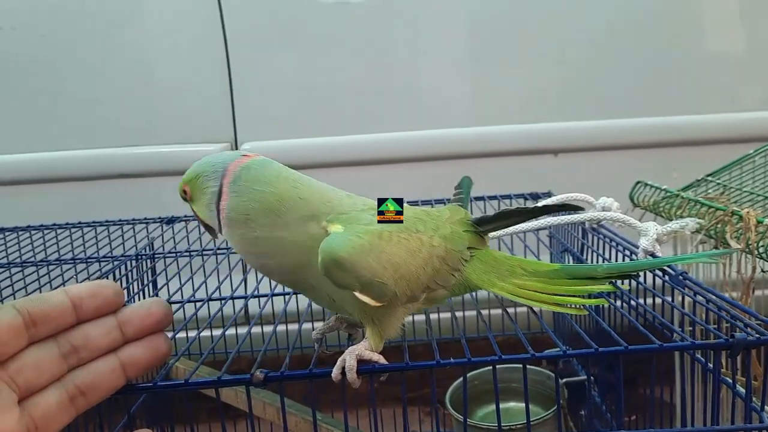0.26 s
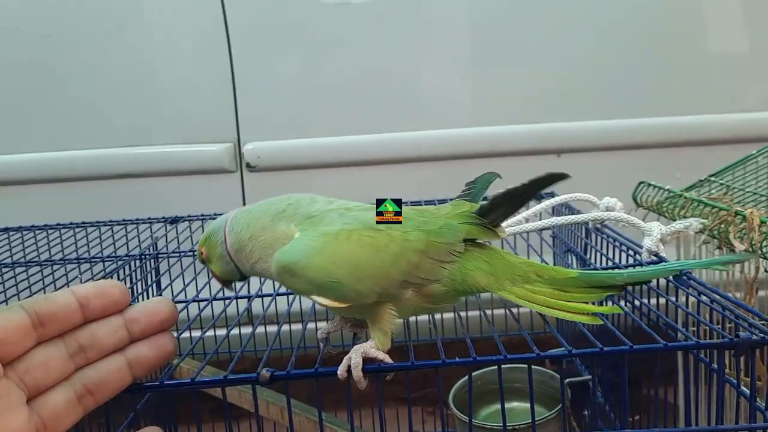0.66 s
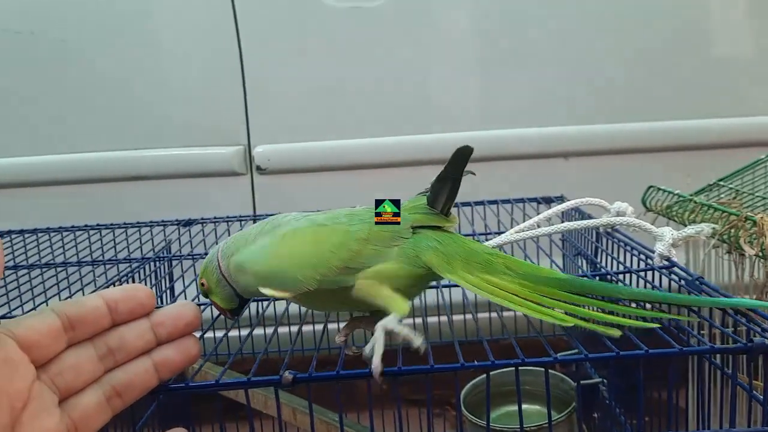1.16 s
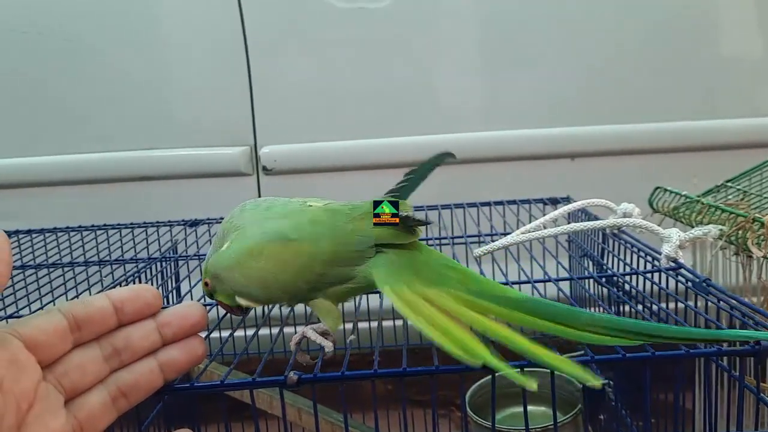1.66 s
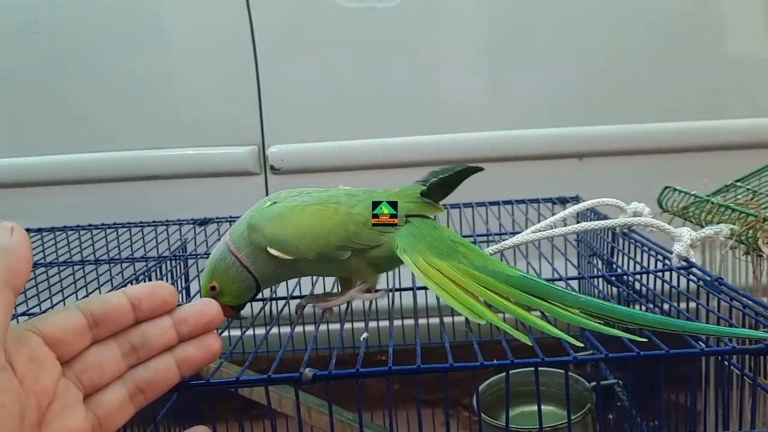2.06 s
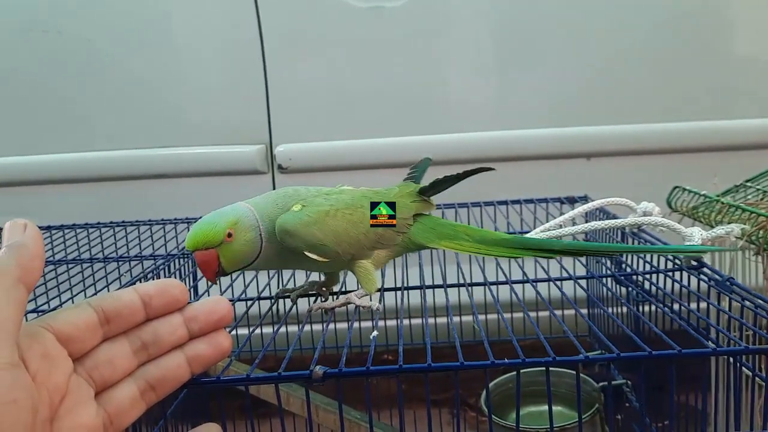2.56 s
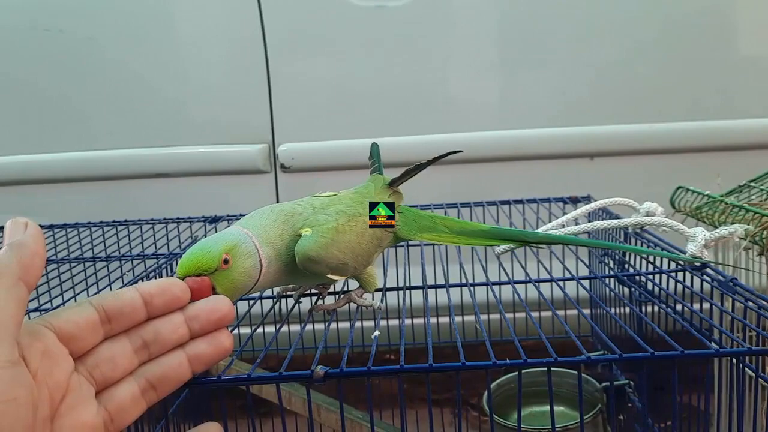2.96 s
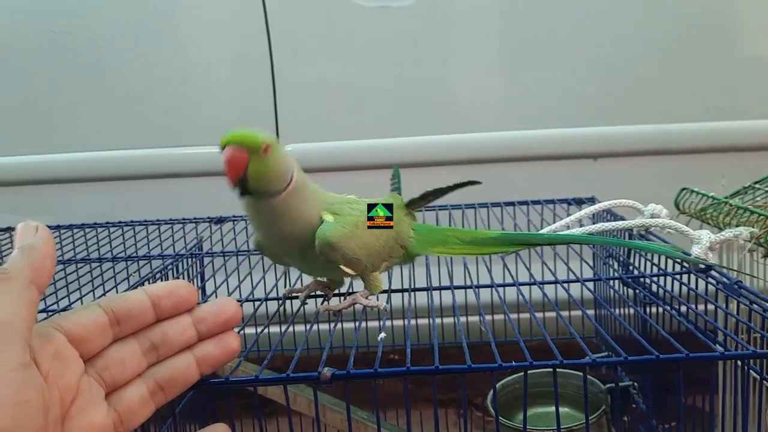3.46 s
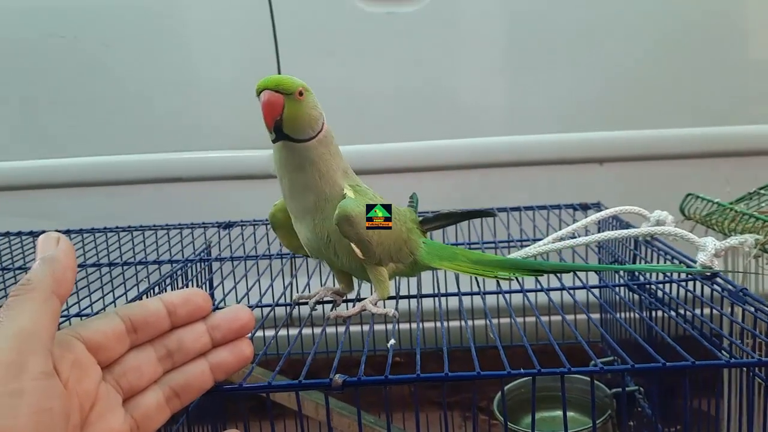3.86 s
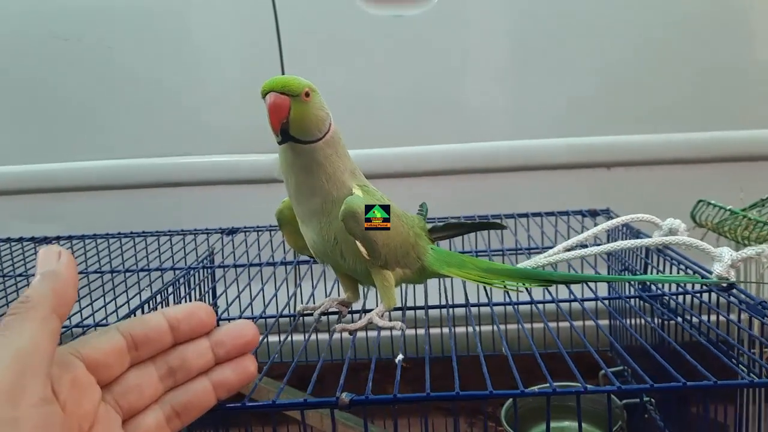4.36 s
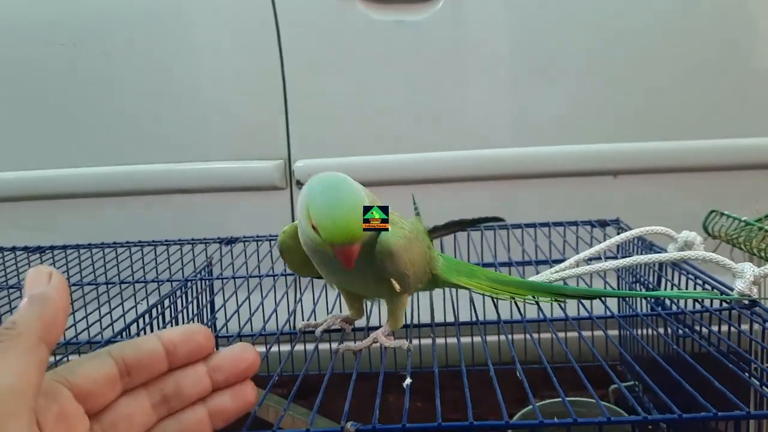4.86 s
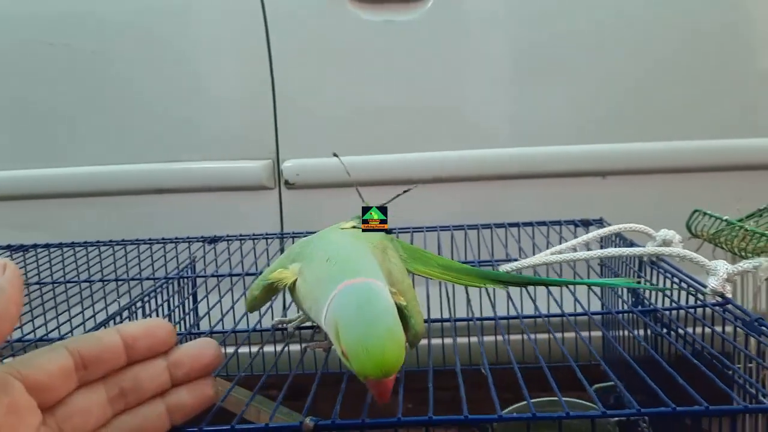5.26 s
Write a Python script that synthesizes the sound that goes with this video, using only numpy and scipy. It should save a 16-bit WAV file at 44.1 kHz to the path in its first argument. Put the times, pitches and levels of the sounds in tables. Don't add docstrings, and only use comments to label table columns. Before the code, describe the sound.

A parakeet heard close in a small hard-walled room. A nasal whine already under way slides down and dies, then claws tick on cage wire with faint feather rustles. One short clear screech drops in pitch; after a pause of light ticks, six loud rasping squawks come in a steady row. A low distant motor hum lies beneath, dipping after the loud calls. Close stereo microphone, bird mostly to the left.

```python
import sys
import numpy as np
from scipy import signal
from scipy.fft import rfft, irfft, next_fast_len
from scipy.io import wavfile
from scipy.ndimage import uniform_filter1d

SR = 44100
rng = np.random.default_rng(int(sys.argv[2]) if len(sys.argv) > 2 else 0)


def bounce(signal):
    frames = np.transpose(np.atleast_2d(signal))
    limited = np.clip(frames, -1, 1)
    pcm = np.round(limited * 32767).astype(np.int16)
    wavfile.write(sys.argv[1], SR, pcm)


def natural_amplitude(level_db):
    exponent = np.asarray(level_db, float) / 20
    return 10 ** exponent


N = 242550

# time_s [s], pitch_hz [Hz], level_db [dB]
WHINE = [
    (0.0, 1693, -25),
    (0.034, 1795, -19),
    (0.044, 1402, -21.5),
    (0.1, 1377, -24.5),
    (0.218, 1265, -29),
    (0.276, 1075, -33.5),
    (0.325, 1041, -31),
    (0.408, 724, -36),
    (0.46, 594, -40),
]
# time_s [s], pitch_hz [Hz], level_db [dB]
SCREECH = [
    (1.856, 1982, -42),
    (1.88, 2004, -19.5),
    (1.952, 1943, -16),
    (2.004, 2063, -19.5),
    (2.024, 1958, -21.5),
    (2.062, 1626, -21),
    (2.084, 1541, -19),
    (2.12, 1419, -35.5),
    (2.128, 1350, -34),
]
# start_s [s], rise_s [s], top_hz [Hz], length_s [s], level_db [dB]
SQUAWKS = [
    (3.44, 0.078, 2592, 0.13, -12.5),
    (3.704, 0.082, 2669, .15, -15.5),
    (3.99, .058, 2784, 0.16, -16),
    (4.281, 0.065, 2718, .15, -15.5),
    (4.566, 0.049, 2696, .16, -18),
    (4.877, .047, 2734, 0.15, -18),
]
# fall_share [0-1], pitch_share [of top pitch], level_db [dB re squawk]
FALL = [(.13, 0.9, -3.5), (.38, .78, -1), (.6, .70, 0.5), (.84, .635, -1), (.9, .6, -6.5), (1, .55, -6.5)]
# freq_hz [Hz], gain_db [dB]
THROAT_OPEN = [(500, 9), (1400, -23.5), (2400, -12), (3100, 6), (3900, 0), (5000, -7), (6000, -14),
               (7300, -9), (9000, -22), (12000, -18), (16000, -16)]
# freq_hz [Hz], gain_db [dB]
THROAT_SHUT = [(500, -10), (1400, 10), (2800, -2.5), (3500, -12), (4200, -17.5), (5600, -23.5),
               (7100, -14.5), (8500, -36), (12000, -31), (16000, -28)]
# freq_hz [Hz], gain_db [dB]
HOARSE = [(1500, -14.5), (3000, -13), (5200, 5), (7500, 7.5), (10000, 14), (16000, 1.5)]
# start_s [s], level_db [dB]
PUFFS = [
    (1.846, -32),
    (3.418, -33),
    (3.686, -33),
    (3.975, -30),
    (4.264, -40),
    (4.553, -39),
    (4.857, -41),
]
# freq_hz [Hz], gain_db [dB]
PUFF_COLOUR = [(300, 1), (1500, -7.5), (2500, 1), (4500, -2.5), (8000, -11), (11000, -18), (16000, -27)]
# time_s [s], left_right_db [dB]
POSE = [(0, 0), (1.9, -5.5), (2.199, 10), (3.3, 1.5), (5.5, 10)]
# start_s [s], peak_db [dB], knock_db [dB], left_right_db [dB]
TICKS = [(0.6846, -17, -11.5, 4), (1.1755, -19, -12, 2), (1.435, -28.5, -15, -4), (2.7585, -38.5, -12, 12),
         (3.0585, -28, -18, 31), (3.066, -27, -36, 24), (3.1581, -60, 29.5, 6), (3.1733, -60.5, 19.5, 15),
         (5.147, -33.5, -33, 26), (5.1594, -25, -41.5, 1), (5.1737, -16.5, -48, 6),
         (3.0617, -20.5, -24, -11),
    (4.484, -50, 8, 5),
]
# freq_hz [Hz], width_hz [Hz], level_db [dB]
WIRE = [(860, 580, 0), (3300, 1200, -13.5), (4770, 1100, -14.5), (6880, 700, -1), (12500, 2100, -16.5)]
# start_s [s], length_s [s], level_db [dB], sheen_db [dB]
RUSTLES = [(0.306, 0.053, -57, 10), (0.692, 0.034, -56, -6), (0.773, 0.14, -71, 14.5),
           (1.017, 0.082, -56.5, 8), (1.102, 0.073, -61, -1), (1.177, 0.044, -49, -4),
           (1.403, 0.12, -54, 1.5), (1.57, 0.092, -61, 5.5), (1.717, 0.15, -59.5, -10),
           (2.325, 0.088, -62, -5), (2.421, 0.078, -61.5, -1), (2.992, 0.044, -64, 13.5),
           (3.072, 0.014, -30, -3), (3.364, 0.042, -54, -2), (4.188, 0.052, -49, -2),
           (4.482, 0.072, -52, 2.5), (5.148, 0.035, -30.5, -2.5), (5.402, 0.053, -63, 4)]
# freq_hz [Hz], t60_s [s]
ROOM_T60 = [(500, 0.1), (1800, 0.31), (3500, 0.21), (8000, 0.22), (15000, 0.2)]
# time_s [s], level_db [dB]
BACKGROUND = [(0.0, -30), (0.3, -32.5), (0.86, -34), (1.3, -31), (1.78, -32), (1.98, -37), (2.6, -39),
              (3.38, -35.5), (3.7, -40), (4.9, -39.5), (5.5, -41.5)]
# freq_hz [Hz], density_db [dB per Hz]
HUM = [(13, -50), (22, -42), (31, -17.5), (64, -4.5), (76, 0), (102, -3), (129, 5), (178, -4.5), (205, -14),
       (230, -17.5), (306, -6.5), (334, -6.5), (381, -20), (480, -55), (620, -35), (1060, -120)]
# freq_hz [Hz], density_db [dB per Hz]
AIR = [(240, -24.5), (400, -2), (640, -5.5), (1900, -11), (4000, -22.5), (7600, -28.5), (8600, -28.5),
       (10000, -32.5), (12800, -32), (14500, -39), (16000, -54.5)]
# freq_hz [Hz], likeness [-1 to 1]
LIKENESS = [(60, 0.92), (180, 0.93), (550, 0.34), (1650, -0.4), (4970, 0.23), (15000, -0.12)]

ROUGH_WHINE, ROUGH_SCREECH, ROUGH_SQUAWK = (.3, .38, .45), (.07, .05, .4), (.8, .33, .28)
LONGEST, HARMONICS = SR // 2, 24
FRAY = .2
HALF_FULL_HZ, HALF_BURST_DB = 2600, 4
WHINE_FIRST_DB, WHINE_FIRST_DB_PER_OCTAVE, WHINE_BRIGHT_DB = -1.5, -29, -4
SCREECH_FIRST_DB, SCREECH_BRIGHT_DB = 4.5, -1.7
SQUAWK_FIRST_DB, SQUAWK_BRIGHT_DB = -0.5, -2.3
CATCH_HZ, CATCH_S, CATCH_DB, CATCH_FIRST_DB = 1330, .009, -9.5, 14.0
OPEN_S, CLIMB_HZ_PER_S, CLIMB_LOST_S = .013, 19000, .034
OPEN_DB, TOP_DB = 0, -7.0
CAGE_WET_DB, EARLY_DB, TAIL_DB = -5.0, -0.5, -9.5
RING_DB, RING_T60_S = -20, 1.2
AIR_DB, AIR_FOLLOWS = -49, 0.77


def parakeet():
    out = np.zeros(N)
    whine = voiced(WHINE, WHINE_FIRST_DB, WHINE_BRIGHT_DB, WHINE_FIRST_DB_PER_OCTAVE)
    add(out, call(whine, ROUGH_WHINE, THROAT_SHUT, leak_db=2.5), 0)
    screech = voiced(SCREECH, SCREECH_FIRST_DB, SCREECH_BRIGHT_DB)
    add(out, call(screech, ROUGH_SCREECH, THROAT_OPEN, leak_db=-2.0), SCREECH[0][0])
    for row in SQUAWKS:
        add(out, call(squawk(*row), ROUGH_SQUAWK, THROAT_OPEN, leak_db=0.5), row[0])
    t = np.arange(1500) / SR
    swell = np.minimum(t / 0.00067, 1) * np.exp(-(t / 0.014) ** 2)
    for start_s, level_db in PUFFS:
        puff = rms_one(coloured(rng.standard_normal(1500), PUFF_COLOUR))
        add(out, natural_amplitude(level_db) * puff * swell, start_s)
    return out


def squawk(start_s, rise_s, top_hz, length_s, level_db):
    catch = [(start_s, CATCH_HZ, level_db + CATCH_DB + 1.0),
             (start_s + CATCH_S, CATCH_HZ, level_db + CATCH_DB + 3.0)]
    climb_hz = CLIMB_HZ_PER_S * (rise_s - CLIMB_LOST_S)
    arch = []
    for u in np.linspace(0, 1, num=6):
        time_s = start_s + OPEN_S + u * (rise_s - OPEN_S)
        pitch_hz = top_hz - climb_hz * (1 - np.sin(u * np.pi / 2))
        arch.append((time_s, pitch_hz, level_db + OPEN_DB + (TOP_DB - OPEN_DB) * u ** 0.66))
    for share, part, db in FALL:
        arch.append((start_s + rise_s + share * (length_s - rise_s), part * top_hz, level_db + db))
    return voiced(catch, CATCH_FIRST_DB, SQUAWK_BRIGHT_DB) + voiced(arch, SQUAWK_FIRST_DB, SQUAWK_BRIGHT_DB)


def voiced(rows, first_db, bright_db, first_db_per_octave=0):
    return [(s, hz, db, first_db + first_db_per_octave * np.log2(hz / 1000), bright_db) for s, hz, db in rows]


def call(rows, rough, throat, leak_db):
    s, *columns = np.transpose(rows)
    start, end = s[0], s[-1]
    t = start + np.arange(LONGEST) / SR
    pitch, level_db, first_db, bright_db = [uniform_filter1d(np.interp(t, s, c), size=130) for c in columns]
    rough = np.interp(t, [start, start + .6 * (end - start), end], rough)
    pitch = pitch * (1 + .007 * drift(60, LONGEST) + rough * .045 * drift(400, LONGEST))
    phase = 2 * np.pi * np.cumsum(pitch) / SR

    tone = np.zeros(LONGEST)
    for k in range(1, HARMONICS + 1):
        hz = k * pitch
        gain_db = at_hz(throat, hz) + first_db * (k == 1) + bright_db * np.log2(np.maximum(hz / 4000, 1))
        flutter_db = (rough + FRAY * k) * 3.37 * drift(200, LONGEST)
        top_loss_db = 11.0 * np.log2(np.maximum(hz / 9500, 1))
        line = np.sin(k * phase + rng.uniform(0, 2 * np.pi))
        tone += natural_amplitude(gain_db + flutter_db - top_loss_db) * (hz < 16500) * line
    tone /= np.sqrt(uniform_filter1d(tone ** 2, size=900))

    half_level = (pitch / HALF_FULL_HZ) ** 2 * natural_amplitude(-13.0 + HALF_BURST_DB * drift(90, LONGEST))
    half = half_level * np.sin(phase / 2 + 1.6 * drift(190, LONGEST))
    puffing = rng.standard_normal(LONGEST) * (0.43 + np.sin(phase))
    air = coloured(rms_one(coloured(puffing, throat)), HOARSE)

    edges = np.clip(np.minimum(t - start + (start < .001), end - t) / 0.0026, 0, 1)
    level = natural_amplitude(level_db + rough * 1.4 * drift(47, LONGEST))
    return level * edges * (tone + rough * (natural_amplitude(leak_db) * air + half))


def ticks():
    out = np.zeros((2, N))
    t = np.arange(1500) / SR
    for start_s, peak_db, knock_db, pan_db in TICKS:
        grit = rng.standard_normal(1500) * (np.exp(-t / .0009) + .08 * np.exp(-t / .006))
        knock, *rings = [natural_amplitude(db) * resonate(grit, hz, width) for hz, width, db in WIRE]
        bright = sum(rings)
        tick = bright / np.abs(bright).max() + natural_amplitude(knock_db) * knock / np.abs(knock).max()
        add(out, natural_amplitude(peak_db) * tick * natural_amplitude([[pan_db / 2], [-pan_db / 2]]), start_s)
    return out


def rustles():
    body, sheen = np.zeros(N), np.zeros(N)
    for start_s, length_s, level_db, sheen_db in RUSTLES:
        u = np.linspace(0, 2, round(2 * length_s * SR))
        swell = natural_amplitude(level_db) * np.minimum(u / .15, 1) * np.exp(-.9 * u ** 3)
        add(body, swell, start_s)
        add(sheen, natural_amplitude(sheen_db) * swell, start_s)
    grit = rng.standard_normal((2, N)) * natural_amplitude(3.0 * drift(220))
    ports = resonate(resonate(grit, 6400, 3000), 7860, 3000)
    ports = ports + natural_amplitude(-46.0) * resonate(grit, 3300, 2000)
    top = resonate(resonate(grit, 12300, 15000), 12300, 15000)
    return (body * rms_one(ports) + sheen * rms_one(top)) * natural_amplitude([[1.5], [-1.5]])


def room(x, wet_db):
    t = np.arange(SR // 2) / SR
    shape = (2, len(t))
    sparse = rng.standard_normal(shape) * (rng.random(shape) < .06) * np.exp(-t / 0.0047)
    echo = natural_amplitude(EARLY_DB) * sparse / np.sqrt(np.sum(sparse ** 2, axis=1, keepdims=True))
    edges = 300 * 2 ** np.arange(0, 6.1, .75)
    ring = natural_amplitude(RING_DB - 60 * t / RING_T60_S)
    tail = 0
    for low, high in zip(edges, edges[1:]):
        band = band_pass(rng.standard_normal(shape), low, high)
        decay = natural_amplitude(-60 * t / at_hz(ROOM_T60, np.sqrt(low * high))) + ring
        tail = tail + band * decay * np.minimum(t / 0.011, 1)
    echo += natural_amplitude(TAIL_DB) * tail / np.sqrt(np.sum(tail ** 2, axis=1, keepdims=True))
    return natural_amplitude(wet_db) * signal.fftconvolve(np.atleast_2d(x) * np.ones((2, 1)), echo, axes=1)[:, :N]


def background():
    s, hum_db = np.transpose(BACKGROUND)
    air_db = AIR_DB + AIR_FOLLOWS * (hum_db - hum_db.mean())
    t, out = np.arange(N) / SR, 0
    hz = np.geomspace(20, 20000, num=40)
    alike = np.clip(at_hz(LIKENESS, hz), -.98, .98)
    for spectrum, level_db in ((HUM, hum_db), (AIR, air_db)):
        mid, side = rng.standard_normal((2, N))
        mid = coloured(mid, np.c_[hz, 10 * np.log10(1 + alike)])
        side = coloured(side, np.c_[hz, 10 * np.log10(1 - alike)])
        pair = rms_one(coloured(np.array([mid + side, mid - side]), spectrum))
        out = out + pair * natural_amplitude(np.interp(t, s, level_db))
    return out * natural_amplitude([[1.5], [-1.5]])


def rms_one(x):
    return x / np.sqrt(np.mean(x ** 2) + 1e-20)


def at_hz(points, hz):
    table_hz, values = np.transpose(points)
    return np.interp(np.log(hz), np.log(table_hz), values)


def drift(rate_hz, size=N):
    r = np.exp(-2 * np.pi * rate_hz / SR)
    noise = rng.standard_normal(size + 4000)
    return rms_one(signal.lfilter([1], [1, -2 * r, r * r], noise)[4000:])


def coloured(x, spectrum):
    size = next_fast_len(x.shape[-1])
    hz = np.maximum(np.arange(size // 2 + 1) * SR / size, 1)
    return irfft(rfft(x, size) * natural_amplitude(at_hz(spectrum, hz)), size)[..., :x.shape[-1]]


def resonate(x, hz, width_hz):
    r = np.exp(-np.pi * width_hz / SR)
    zeros = np.array([1, 0, -1]) * (1 - r * r) / 2
    return signal.lfilter(zeros, [1, -2 * r * np.cos(2 * np.pi * hz / SR), r * r], x)


def band_pass(x, low_hz, high_hz):
    return signal.sosfilt(signal.butter(2, [low_hz, high_hz], "band", fs=SR, output="sos"), x)


def add(track, piece, start_s):
    at = round(start_s * SR)
    track[..., at:at + piece.shape[-1]] += piece[..., :N - at]


def scene():
    bird, cage = parakeet(), ticks()
    n = np.arange(N)
    late = np.interp(n - 0.000412 * SR, n, bird)
    direct = np.array([natural_amplitude(-1.0) * bird, natural_amplitude(-5.0) * late])
    pan_db = np.interp(n / SR, *np.transpose(POSE))
    bird = (direct + room(bird, 0.1)) * natural_amplitude([pan_db / 2, -pan_db / 2])
    return bird + cage + room(cage, CAGE_WET_DB) + rustles() + background()


def roll_off(x):
    return signal.sosfilt(signal.butter(12, 17000, fs=SR, output="sos"), x)


def record(dry):
    shadow = band_pass(dry ** 2, 45, 1500)
    bent = np.tanh(dry + natural_amplitude(-8.0) * shadow)
    cut = signal.sosfilt(signal.cheby2(10, 40, 16400, fs=SR, output="sos"), bent)
    return roll_off(cut)


dry = scene()
out = record(dry)
bounce(out)
```